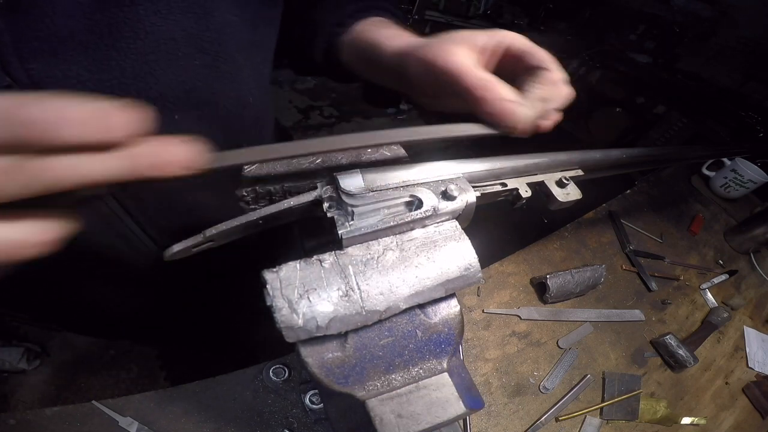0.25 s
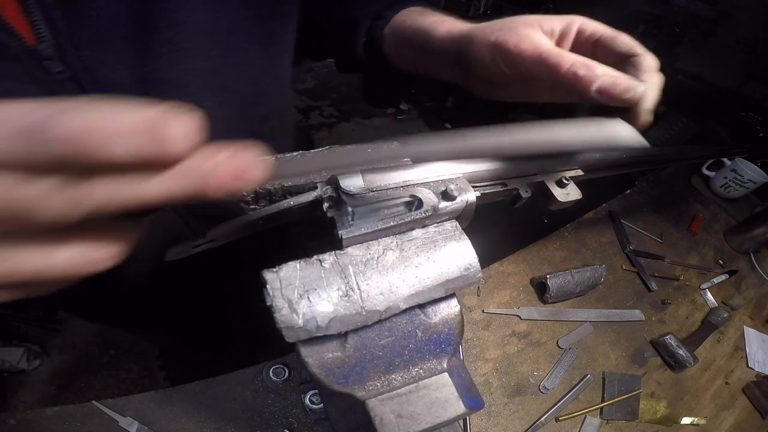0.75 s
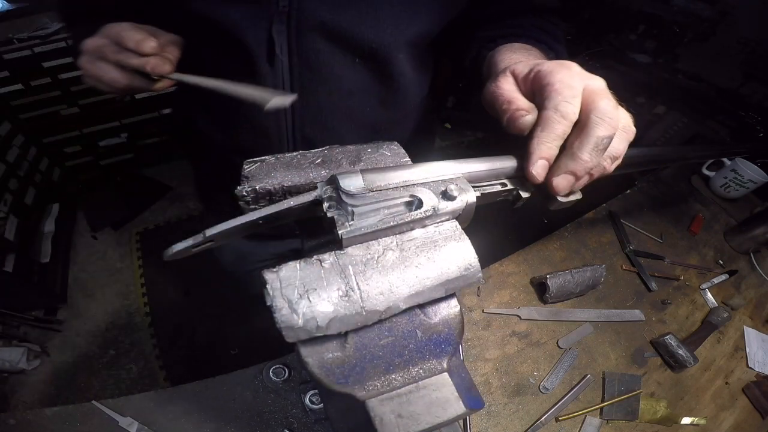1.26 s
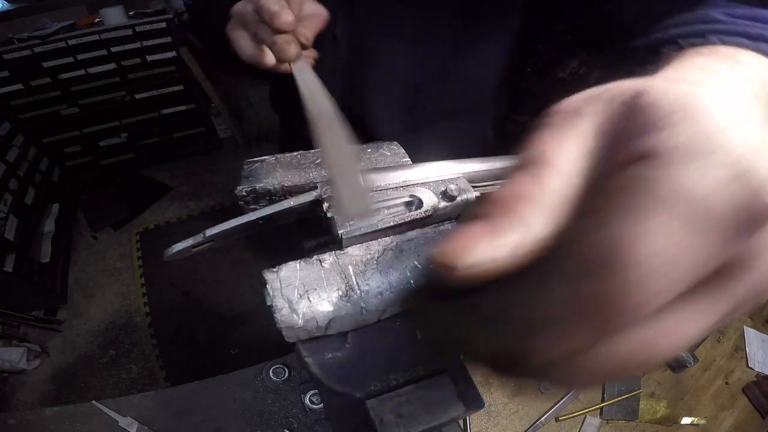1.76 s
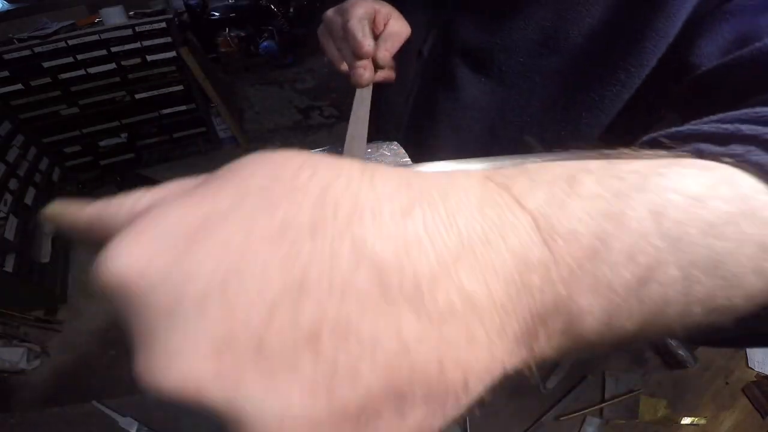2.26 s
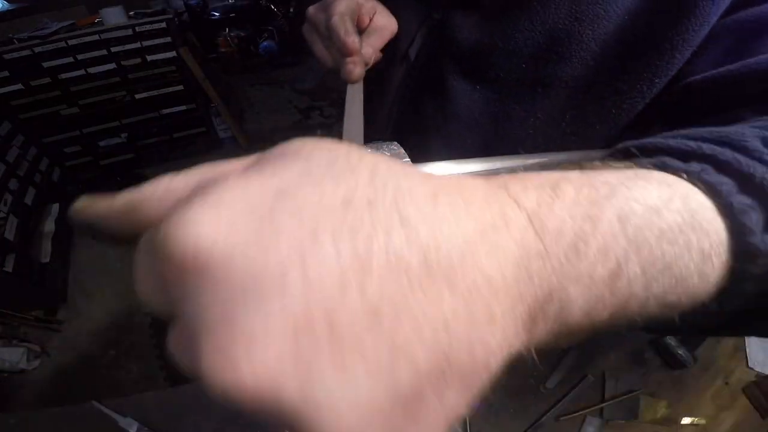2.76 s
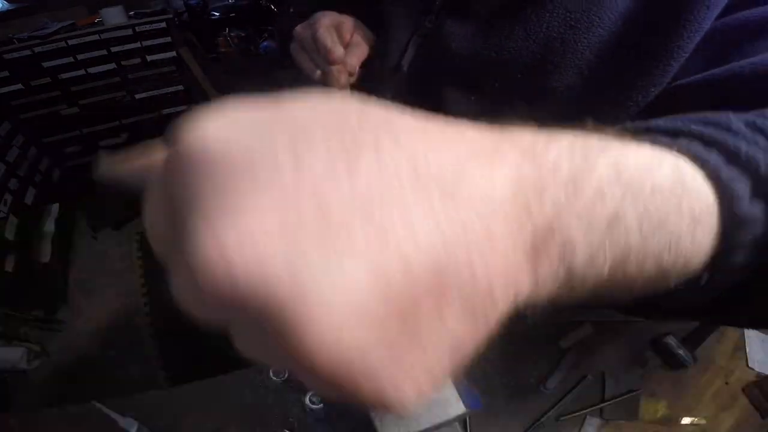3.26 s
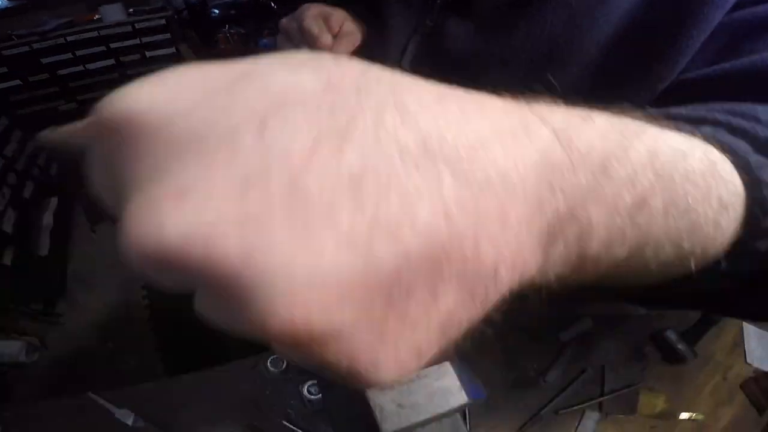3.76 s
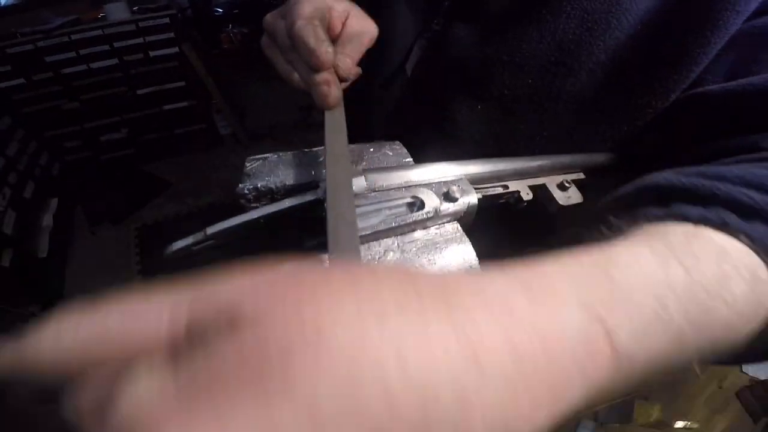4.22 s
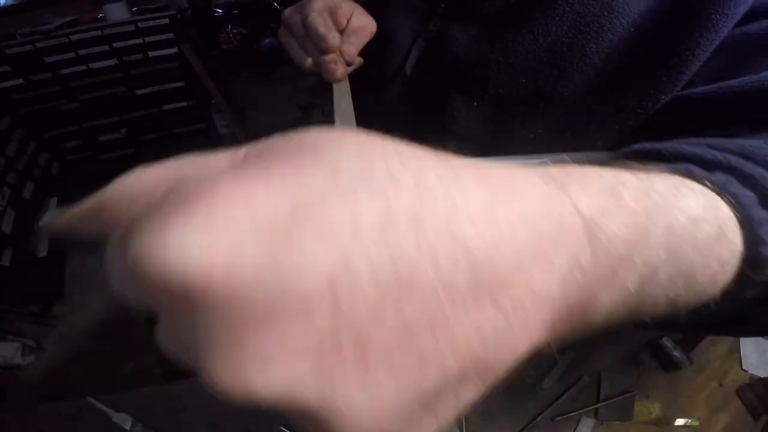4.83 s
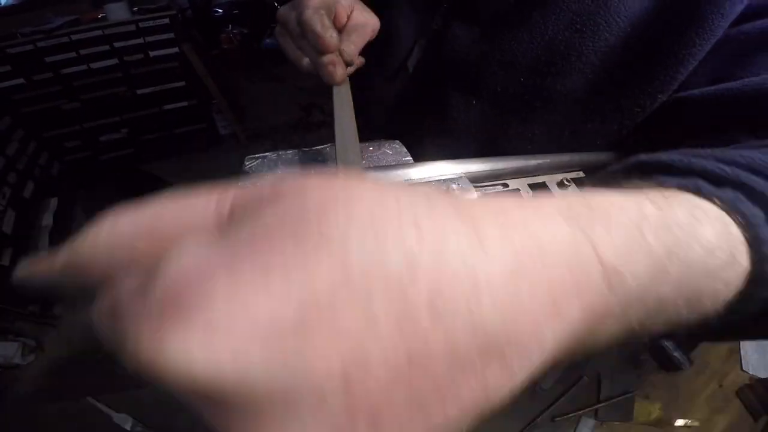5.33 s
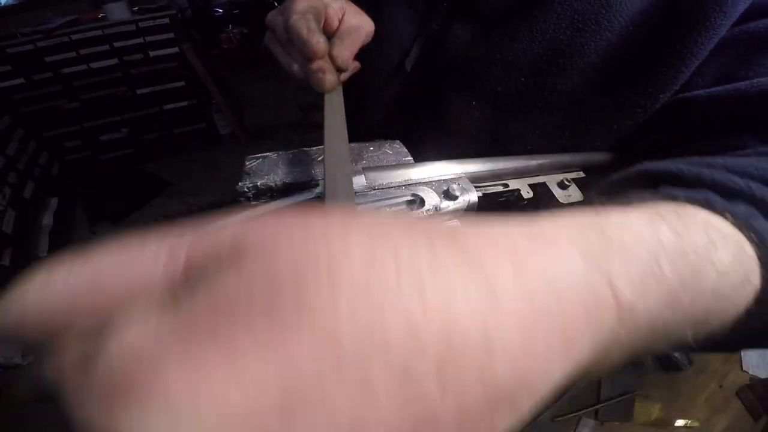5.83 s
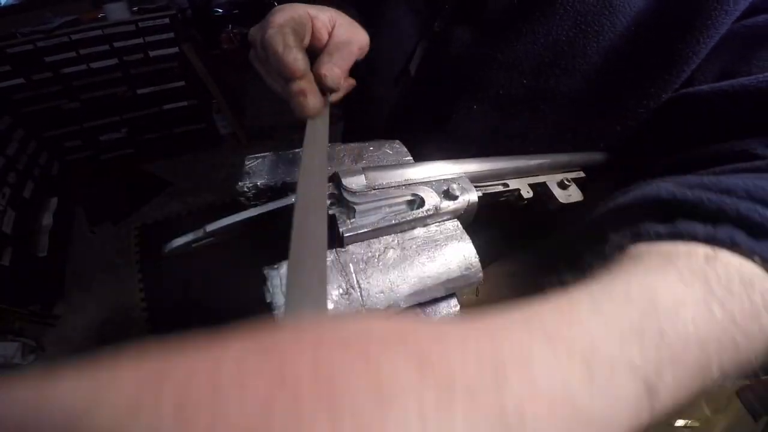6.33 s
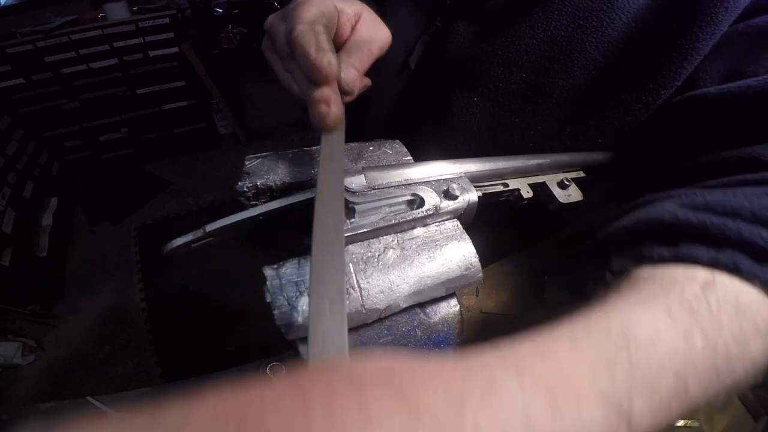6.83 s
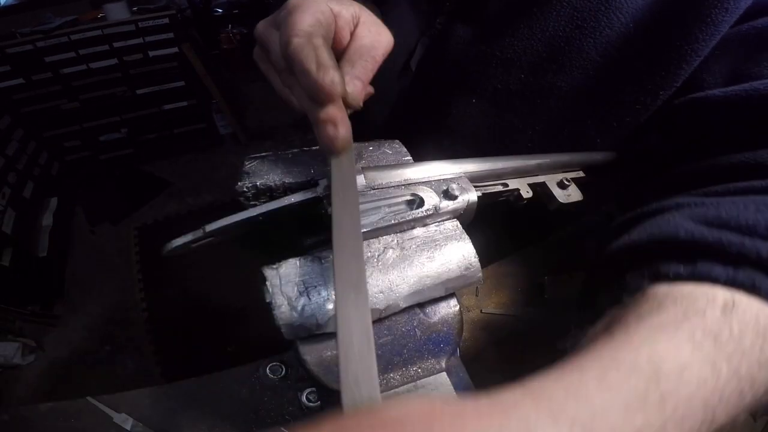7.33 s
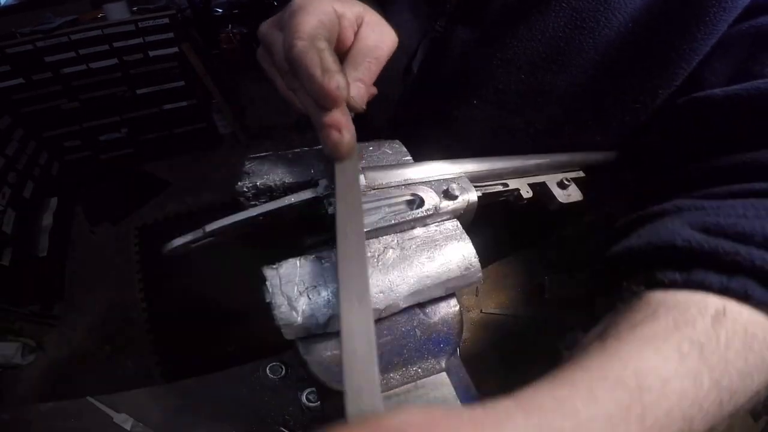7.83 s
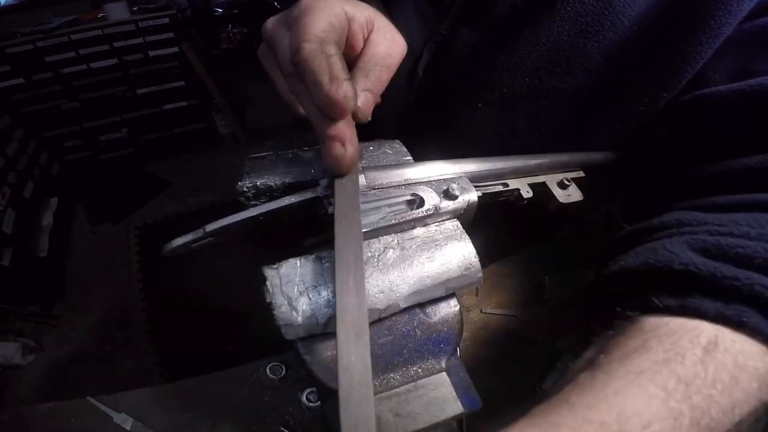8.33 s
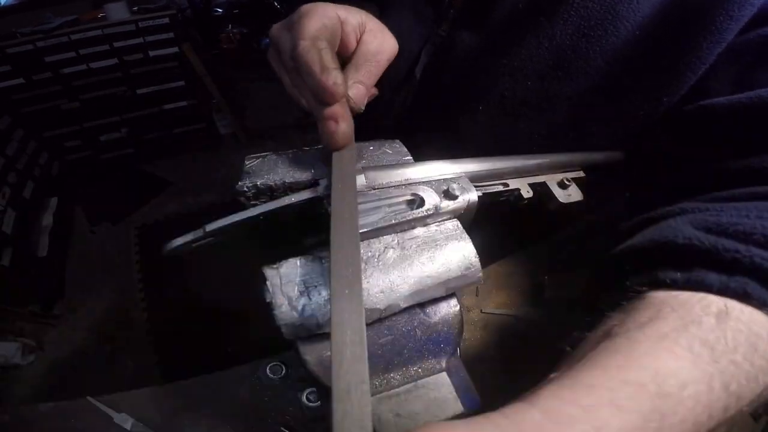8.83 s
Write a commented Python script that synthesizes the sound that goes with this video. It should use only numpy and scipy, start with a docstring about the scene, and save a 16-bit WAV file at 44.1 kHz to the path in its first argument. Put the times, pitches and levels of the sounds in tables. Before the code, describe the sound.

Very close in a small, quiet workshop, a hand file starts with two lighter rasps, pauses with a sharp click as it drops on the clamped metal, then settles into steady strokes, about two a second. Bench rumble sits underneath, and tiny loose metal tinks fall between strokes. The hand scuffs and bumps the camera, once hard enough to distort the microphone, later with weaker knocks.

```python
"""A hand file rasps over a metal part clamped in a bench vise, about two strokes a second, heard from very close.
Most strokes land with a click; all swell and ease off. The teeth ring the part, the bench rumbles, and a loose
bit of metal tinks. The filing hand scuffs and knocks the camera on its springy arm, once hard enough to overload it.
Random bites through resonances make the rasp, decaying sines and short noise bursts make the knocks and tinks.
Sleeves brush softly, and a quiet workshop of coloured noise and thin whines lies behind."""
import sys
import numpy as np
from scipy import signal
from scipy.fft import rfft, irfft
from scipy.io import wavfile
from scipy.ndimage import map_coordinates

SR = 44100
rng = np.random.default_rng(int(sys.argv[2]) if len(sys.argv) > 2 else 0)


def dump(signal):
    """Clip the signal to [-1, 1] and save it as 16-bit WAV at the path in sys.argv[1]."""
    limited = np.clip(np.atleast_2d(signal).T, -1, 1)
    pcm = np.round(limited * 32767).astype(np.int16)
    wavfile.write(sys.argv[1], SR, pcm)


N = 400428
T = np.arange(N) / SR  # time in s
HZ = np.maximum(np.arange(N // 2 + 1) * SR / N, 1)  # frequencies of the spectrum
RING_T = T[:SR]  # one second for a single knock to die away

# file strokes: [touch-down t/s, length/s, attack/s, release/s, rasp level/dB, landing click level/dB,
# bench shake level/dB]
STROKES = [ (-0.077, .29, .17, 0.13, -39.5, -70, -45), (0.458, 0.25, 0.12, 0.083, -40.5, -32, -47.5),
           (1.3638, 0.14, .02, 0.095, -54, -18.5, -48), (2.0954, .255, 0.24, 0.066, -49.5, -38.5, -56),
           (2.375, 0.23, 0.12, 0.1, -39, -70, -43), (2.617, 0.19, 0.097, 0.091, -37.5, -70, -41.5),
           (2.804, .25, 0.13, 0.099, -38.5, -70, -48), (3.3076, 0.3, 0.11, 0.12, -37, -32, -49),
           (3.8756, 0.28, .1, 0.099, -38, -28.5, -55.5), (4.3965, .29, 0.16, 0.13, -36.5, -39, -52),
           (4.9248, 0.29, 0.17, 0.084, -36, -27, -50), (5.4802, .26, 0.12, 0.11, -36.5, -31, -51.5),
           (6.0114, 0.32, 0.073, 0.21, -36, -28.5, -52.5), (6.563, 0.25, 0.12, 0.13, -34.5, -24.5, -50),
           (7.053, 0.28, 0.15, .11, -35.5, -47, -52.5), (7.5898, 0.25, .11, 0.093, -36, -31.5, -49.5),
           (7.845, 0.052, 0.024, .025, -55.5, -70, -52), (8.092, 0.29, 0.14, 0.13, -36, -45, -52),
           (8.397, 0.085, 0.044, .035, -45.5, -40.5, -58), (8.648, 0.28, 0.15, 0.13, -37.5, -33.5, -49), ]


def amp(db):
    """Turn decibels into a gain."""
    return 10 ** (np.asarray(db) / 20)


def unit(x):
    """Scale a sound to rms 1."""
    return x / np.sqrt(np.mean(x ** 2))


def envelope(rows):
    """Gain over time, drawn in straight dB lines through [t/s, level/dB] rows."""
    s, db = np.transpose(rows)
    return amp(np.interp(T, s, db))


def swell(s, length, attack, release):
    """Rounded attack, hold and release, from 0 to 1 and back."""
    rise = np.clip((T - s) / attack, 0, 1)
    fall = np.clip((s + length - T) / release, 0, 1)
    return rise ** 2 * (3 - 2 * rise) * fall ** 2 * (3 - 2 * fall)


def colour(points):
    """Gain per frequency, drawn through [f/Hz, level/dB] points."""
    hz, db = np.transpose(points)
    return amp(np.interp(np.log(HZ), np.log(hz), db))


def resonances(rows):
    """Gain per frequency of a body with [f/Hz, width/Hz, level/dB] resonances."""
    power = 0
    for hz, width, db in rows:
        detuning = (HZ - hz ** 2 / HZ) / width
        power = power + amp(db) ** 2 / (1 + detuning ** 2) ** 1.5
    return np.sqrt(power)


def causal(gain):
    """Turn a gain per frequency into the response to one tap, with its energy as early as possible."""
    cepstrum = irfft(np.log(gain + 1e-6), N)
    # folding the second half onto the first gives minimum phase
    cepstrum[1:N // 2] *= 2
    cepstrum[N // 2 + 1:] = 0
    return irfft(np.exp(rfft(cepstrum)), N)[:len(RING_T)]


def shaped(x, gain):
    """Filter a sound by a gain per frequency; rms 1."""
    return unit(irfft(rfft(x) * gain, N))


def noise(gain):
    """Noise of a given colour; rms 1."""
    return shaped(rng.standard_normal(N), gain)


def walk(rate):
    """Smooth random wandering, changing about rate times a second; rms 1."""
    return noise(1 / (1 + (HZ / rate) ** 4))


def delayed(x, lag):
    """Read a sound through a moving delay (s)."""
    return map_coordinates(x, [(T - lag) * SR], order=3)


def fade(t60):
    """Exponential decay, 60 dB in t60 seconds."""
    return np.exp(-np.log(1000) * RING_T / t60)


def ring(modes):
    """Dying sines of [f/Hz, level/dB, t60/s] modes, each mode struck a little differently every time."""
    sound = 0
    for hz, db, t60 in modes:
        sound = sound + amp(db + rng.standard_normal()) * fade(t60) * np.sin(2 * np.pi * hz * RING_T)
    return sound


def strike(body, t60, chatter):
    """One contact and its dying chatter through a body's response; peak 1."""
    force = chatter * rng.standard_normal(len(RING_T)) * fade(t60)
    force[0] += 1
    sound = signal.fftconvolve(force, body)[:len(RING_T)]
    return sound / np.abs(sound).max()


def add(out, s, sound):
    """Mix a sound in at time s."""
    start = int(s * SR)
    out[start:start + len(sound)] += sound[:N - start]


def bites(rate, spread_db):
    """Tiny breaks of uneven size at random moments, about rate a second, as when teeth lift chips."""
    happens = rng.random(N) < rate / SR
    return happens * rng.standard_normal(N) * amp(spread_db * rng.standard_normal(N))


def filing(tooth_hz=4000, pace_spread=0.1, tooth_db=-8, rasp_db=-1.5):
    """Each stroke speeds up and slows; the tooth rate follows the speed, and the bites ring the steel."""
    # resonances of file and clamped part: [f/Hz, width/Hz, level/dB]
    steel_modes = [(683.4, 110, -15), (970, 31, -15.5), (1700, 13, -12), (1918, 120, -14.5), (2030, 16, -9),
                   (2890, 100, -2.5), (3520, 37, -2), (3852, 67, -2), (4285, 160, 3), (4813, 98, 1.5),
                   (5160, 77, -7), (5856, 590, -6.5), (6540, 68, -2), (7400, 140, -8), (8490, 270, -36),
                   (9900, 46, -46)]
    # broad colour of the cutting teeth: [f/Hz, level/dB]
    cut_colour = [(180, -49), (300, -15.5), (523, -32), (691, -26.5), (1150, -18.5), (1910, -16.5),
                  (2560, -12), (2870, -1.5), (3170, -41.5), (3330, -7), (4250, -10.5), (4540, -16),
                  (6620, -9), (15000, -23)]
    steel = np.hypot(resonances(steel_modes), amp(-5) * colour(cut_colour))

    push, speed, travel = np.zeros((3, N))
    for s, length, attack, release, db, _, _ in STROKES:
        push += amp(db) * swell(s, length, attack, release)
        progress = np.clip((T - s) / length, 0, 1)
        pace = 1 + pace_spread * rng.standard_normal()
        speed += np.abs(np.sin(np.pi * progress)) ** 0.6 * pace
        travel += np.sin(np.pi * progress / 2) ** 2 * (progress < 1)
    full = amp(-32.5)  # push that counts as a full cut
    effort = push / full
    unsteady = 1 + 0.05 * walk(20)
    tooth_rate = tooth_hz * (1 + speed) / 2 * unsteady

    grit_db, catch_db = 0.1 * walk(180), 1.13 * walk(30)  # fast and slower unevenness
    force = bites(rate=12000, spread_db=1) * amp(grit_db + catch_db)
    # following rows of teeth meet the same burr, so bands glide with the speed
    force = force + 0.3 * delayed(force, 4 / tooth_rate)
    # the wave from the file's tip returns sooner as the contact travels along it
    force = force + 0.3 * delayed(force, 0.0026 - 0.0009 * travel)
    # the file rocks on two edges of the part, so the colour of the rasp keeps shifting
    force = force + 0.5 * delayed(force, 0.0005 * (1 + 0.2 * walk(12)))
    chips = shaped(force, steel)

    # a light touch sounds dull, and so does the end of the stroke; the treble needs a full cut
    spectrum = rfft(chips)
    low = irfft(spectrum / (1 + (HZ / 2400) ** 6), N)
    high = irfft(spectrum / (1 + (8000 / HZ) ** 6), N)
    middle = chips - low - high
    late_db = 4 * (travel - 0.5)
    rasp = amp(late_db) * low * effort ** 0.42 + middle * effort + high * effort ** 1.05

    # the two crossed cuts of teeth sing rough notes that follow the speed and fade as the stroke runs out
    phase = 2 * np.pi * np.cumsum(tooth_rate * (1 + 0.04 * walk(400))) / SR
    notes = np.sin(phase) * walk(200) + 0.6 * np.sin(1.6 * phase) * walk(200)
    sung = notes * effort ** 1.21 * (1 - 0.74 * travel)
    teeth = shaped(sung, np.sqrt(steel)) * np.sqrt(np.mean(effort ** 2))
    return full * amp(rasp_db) * (rasp + amp(tooth_db) * teeth)


def landings(thud_db=-18):
    """The file drops on the part and once snags; the heaviest drop chatters longer and thuds through the vise."""
    # resonances of the file as it drops on the part: [f/Hz, width/Hz, level/dB]
    click_modes = [(1316, 47, -10.5), (2760, 800, -10.5), (4170, 510, -4.5), (4800, 430, -5),
                   (4940, 390, -8.5), (6200, 1600, -11), (7840, 510, -15.5), (10900, 1600, -27.5)]
    usual_t60_s, heaviest_t60_s = 0.023, 0.03
    out, body = np.zeros(N), causal(resonances(click_modes))
    drop_s, *_, drop_db, _ = max(STROKES, key=lambda row: row[-2])
    for s, *_, db, _ in STROKES:
        if s > 0:  # a stroke already under way at the start has no landing
            t60 = heaviest_t60_s if s == drop_s else usual_t60_s
            add(out, s, amp(db) * strike(body, t60, chatter=0.64))
    # the teeth catch once in mid-stroke
    add(out, 4.0932, amp(-26) * strike(body, t60=0.095, chatter=0.76))
    vise = causal(resonances([(278, 53, 0.5), (702, 65, 2.0), (1390, 690, -12.5), (5000, 4700, -21)]))
    add(out, drop_s + 0.0072, amp(drop_db + thud_db) * strike(vise, t60=0.16, chatter=0.33))
    return out


def tinks(ring_db=-12, tick_db=1, uneven_db=4):
    """A tiny loose metal piece taps as the arm draws back, on a different spot each time, so its modes vary."""
    # taps of the loose piece: [t/s, level/dB]
    taps = [(3.762, -51.5), (4.2552, -52), (4.8674, -49.5), (5.4071, -52), (5.9077, -45), (6.332, -44),
            (6.9243, -48), (7.4147, -46), (7.9823, -55.5), (8.4652, -45.5)]
    # its modes: [f/Hz, level/dB, t60/s]
    tap_modes = [(7130, 7, .09), (8100, 2, 0.032), (9600, -9, 0.026), (10755, 2, 0.11), (10570, -9, .08),
                 (11800, -19, 0.088), (12610, -12, 0.039), (13400, -13, 0.073), (14140, -10.5, .07)]
    out = np.zeros(N)
    body = causal(colour([(3000, -39.0), (6000, -21), (7200, 2), (10500, -1.5), (15000, -12)]))
    for s, db in taps:
        modes = [(hz, mode_db + uneven_db * rng.uniform(-1, 1), t60) for hz, mode_db, t60 in tap_modes]
        tick = strike(body, t60=0.04, chatter=0.5)
        add(out, s, amp(db + ring_db) * ring(modes) + amp(db + tick_db) * tick)
    return out


def bench(sway_hz=20):
    """Each stroke shakes the bench, whose resonances rumble on a little; the camera arm keeps swaying."""
    # bench resonances: [f/Hz, width/Hz, level/dB]
    bench_modes = [(63, 18, -6.5), (106.5, 13, 7), (135, 10, -14.5), (247.8, 22, -9.5), (306, 47, -21.5),
                   (672, 90, -26.5)]
    # strength of the camera arm's deep sway, in two runs of rows: [t/s, level/dB]
    sway_levels = [
        [(0.0, -46), (1.69, -63), (2.82, -35.5), (3.26, -51), (3.6, -40.5)],
        [(4.0, -34.5), (4.04, -37.5), (5.93, -48), (8.99, -44), (9.05, -48.5)],
    ]
    attack_s, release_s, linger_s = 0.076, 0.24, 0.18
    shake_power = np.zeros(N)
    for s, length, *_, db in STROKES:
        shake_power += (amp(db) * swell(s, length + linger_s, attack_s, release_s)) ** 2
    rumble = noise(resonances(bench_modes)) * np.sqrt(shake_power)
    wandering_hz = sway_hz * (1 + 0.13 * walk(14))
    sway = np.sin(2 * np.pi * np.cumsum(wandering_hz) / SR) * envelope(np.concatenate(sway_levels))
    return rumble + np.sqrt(2) * sway


def camera_knocks(buzz_db=-14):
    """The hand scuffs the camera and makes it lurch; each knock rings housing, bracket, arm and springs."""
    # knocks: [t/s, housing level/dB, thin below f/Hz, dull above f/Hz, bracket level/dB, arm level/dB]
    knocks = [(3.6827, -2.5, 102, 1590, -32, -46.5), (3.690, -2.5, 100, 3500, -23, -40),
              (3.716, -14, 300, 1290, -37, -51.5), (3.776, -27, 501, 1300, -72, -62.5),
              (3.796, -22.5, 150, 997, -64, -64.5), (3.8133, 3.5, 110, 2890, -30, -43),
              (6.186, -31.5, 500, 1200, -60, -44), (6.2058, -15.5, 200, 2040, -38.5, -24.5),
              (6.283, -24.5, 1192, 1835, -52.5, -34.5), (7.2957, -26.5, 200, 1720, -51, -28.5)]
    # resonances of the plastic housing: [f/Hz, width/Hz, level/dB]
    housing_modes = [(265.8, 160, -1), (562.7, 90, -8), (640, 125, 0.5), (834, 156, -1.5), (969, 63, -8),
                     (1290, 100, -4), (1610, 290, -1.5), (1835, 340, -2.5), (2587, 300, -15.5),
                     (4226, 5000, -9)]
    # modes of the metal bracket: [f/Hz, level/dB, t60/s]
    bracket_modes = [(710, -6, 0.099), (1010, -5, 0.056), (1220, -12, .07), (1869, 1.5, 0.2),
                     (1893, -0.5, 0.15), (2480, -12.5, 0.13), (2622, -19.5, .14), (3000, -13.5, .11),
                     (3170, -19.5, 0.19)]
    # modes of the arm that holds the camera: [f/Hz, level/dB, t60/s]
    arm_modes = [(102, -9.5, .2), (256.5, -3, 0.32), (263, -12.5, 0.2), (302.2, -10.5, 0.31),
                 (394.7, -12.5, 0.14), (575, -8, .06), (733, -5.5, 0.077), (900, -20.5, .09),
                 (1590, -21.5, 0.21), (1915, -9, 0.03966)]
    # the arm's springs, buzzing on after a knock: [f/Hz, width/Hz, level/dB]
    spring_modes = [(257, 13, 1.5), (310, 55, -6.5), (680, 130, -12), (1542, 130, -20)]
    # deep lurch of the camera when shoved: [f/Hz, level/dB, t60/s]
    lurch_modes = [(30.5, -5, 0.053), (15.6, -17, 0.97), (56, -6.5, 0.16), (96, -16.5, 0.071)]
    out = scuff()
    add(out, 3.685, ring(lurch_modes))
    housing, springs = resonances(housing_modes), causal(resonances(spring_modes))
    for s, db, thin_hz, dull_hz, bracket_db, arm_db in knocks:
        limits = np.sqrt((1 + (HZ / dull_hz) ** 10) * (1 + (thin_hz / HZ) ** 4))
        knock = amp(db) * strike(causal(housing / limits), t60=0.021, chatter=0.15)
        bracket = amp(bracket_db) * ring(bracket_modes)
        arm = ring(arm_modes) + amp(buzz_db) * strike(springs, t60=1.9, chatter=0.76)
        add(out, s, knock + bracket + amp(arm_db) * arm)
    return out


def scuff():
    """Skin drags over the housing in tiny slips, louder and louder until it slides off."""
    # colour of the scuff: [f/Hz, level/dB]
    scuff_colour = [(60, -17.5), (300, -6), (450, -10.5), (1000, 8), (1800, -8), (2800, -2.5),
                    (3600, -10.5), (5500, -13), (8700, -36.5), (10000, -10), (12000, -18), (15000, -41)]
    start_s, length_s, peak_db = 3.673, 0.021, -8.5
    rise_db_per_s, t60_s = 598.5, 0.021
    past_peak = T - start_s - length_s
    pressing = amp(peak_db + rise_db_per_s * np.minimum(past_peak, 0)) * (T >= start_s)
    slipping = np.exp(-np.log(1000) * np.clip(past_peak, 0, 1) / t60_s)
    return shaped(bites(rate=9000, spread_db=3), colour(scuff_colour)) * pressing * slipping


def sleeves(flutter_db=1.5):
    """A sleeve brushes softly as the arms change position: noise of cloth in uneven swishes."""
    # swishes: [t/s, length/s, level/dB]
    brushes = [(1.0, 0.24, -60), (1.68, .45, -68)]
    # the cloth's colour: [f/Hz, level/dB]
    cloth = [(500, -25), (1000, -14), (1500, -1), (2500, -5), (3700, 1.5), (5500, -11), (10000, -26)]
    contact = sum(amp(db) * swell(s, length, length / 2, length / 2) for s, length, db in brushes)
    return noise(colour(cloth)) * contact * amp(flutter_db * walk(40))


def workshop(air_db=-60.5):
    """Soft background noise that hardly varies, with thin, wavering electrical whines."""
    # colour of the background: [f/Hz, level/dB]
    shop_colour = [(24, -39.5), (40, 4.5), (108, -4), (169, -10), (338, -14.5), (392, -12.5), (659, -17),
                   (980, -20.5), (3140, -21.5), (3650, -20.5), (6460, -26), (7490, -28.5), (15000, -34)]
    # faint electrical whines: [f/Hz, level/dB]
    whines = [(2832, -85), (4290, -85), (6293, -80), (6325, -80), (8543, -89), (12618, -84)]
    waver_hz = 4 * walk(25)
    whine = np.zeros(N)
    for hz, db in whines:
        whine += amp(db) * np.sqrt(2) * np.sin(2 * np.pi * np.cumsum(hz + waver_hz) / SR)
    return amp(air_db + 0.5 * walk(3)) * noise(colour(shop_colour)) + whine


def room(x, t60=0.18, wet_db=-11, dull_hz=6000):
    """Short, dull reflections from bench top and crowded walls, made with a dying noise tail."""
    tail = rng.standard_normal(len(RING_T)) * fade(t60) * (RING_T > 0.004)
    tail = tail / np.sqrt(np.sum(tail ** 2))
    tail = signal.lfilter(*signal.butter(2, dull_hz, fs=SR), tail)
    return x + amp(wet_db) * signal.fftconvolve(x, tail)[:N]


def scene():
    """Airborne sounds pass through the room; knocks and rumble reach the microphone through its mount."""
    airborne = room(filing() + landings() + tinks() + sleeves())
    return (airborne + bench() + camera_knocks() + workshop())[None]


def record(dry):
    """The recorder rounds off overloads and cuts the top."""
    rounded = dry / (1 + dry ** 6) ** (1 / 6)
    top_hz = 15250
    top_cut = signal.ellip(8, 0.2, 70, top_hz, fs=SR, output="sos")
    return signal.sosfilt(top_cut, rounded)


dry = scene()
out = record(dry)
dump(out)
```